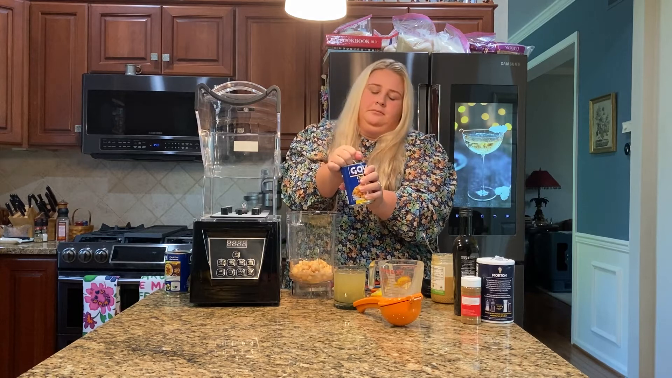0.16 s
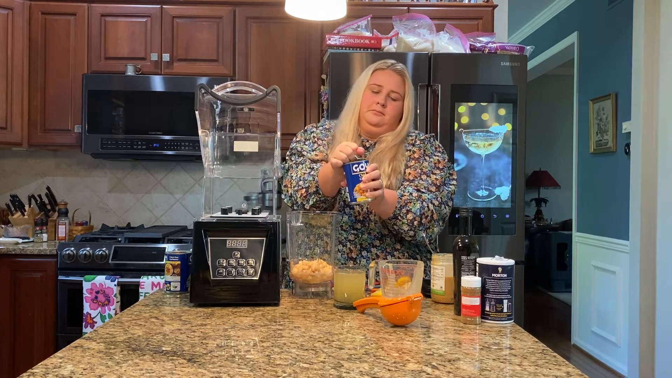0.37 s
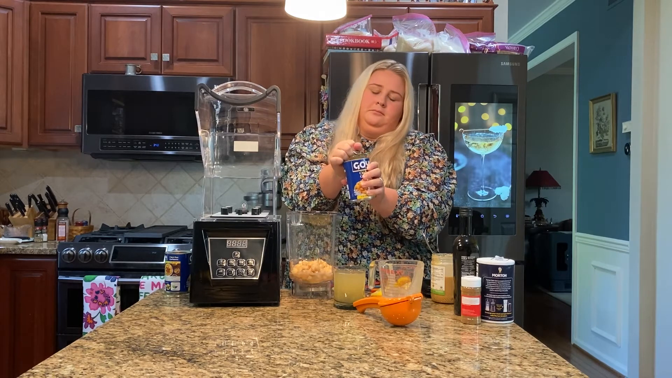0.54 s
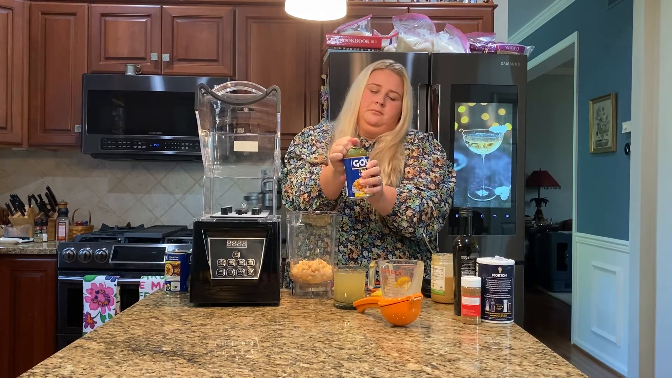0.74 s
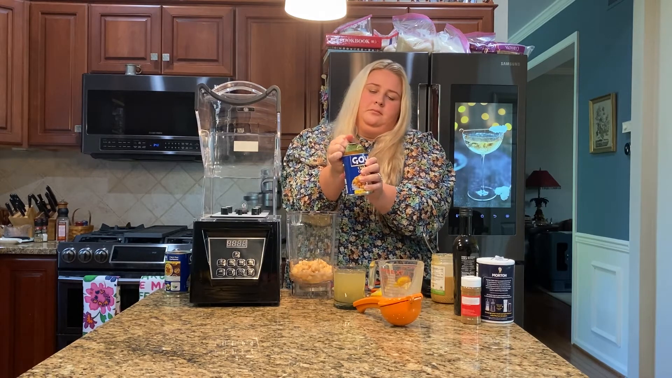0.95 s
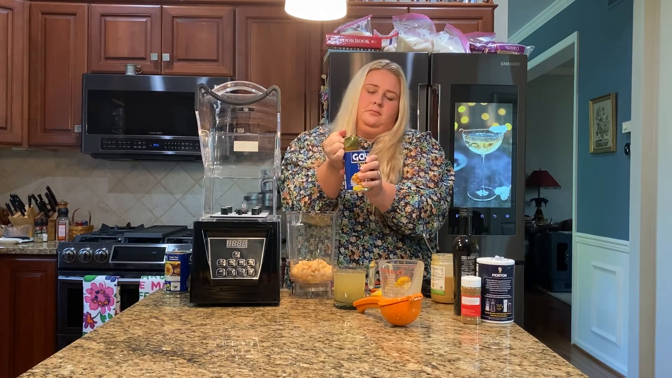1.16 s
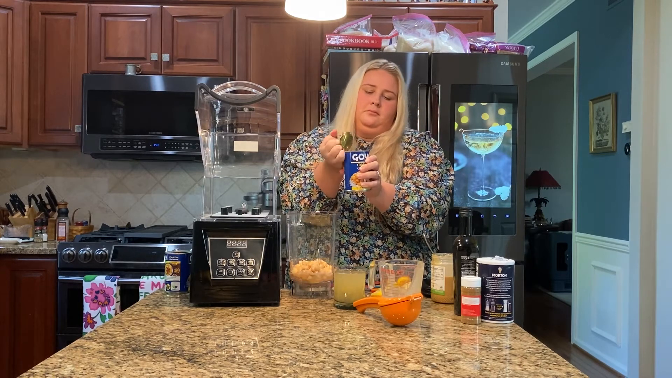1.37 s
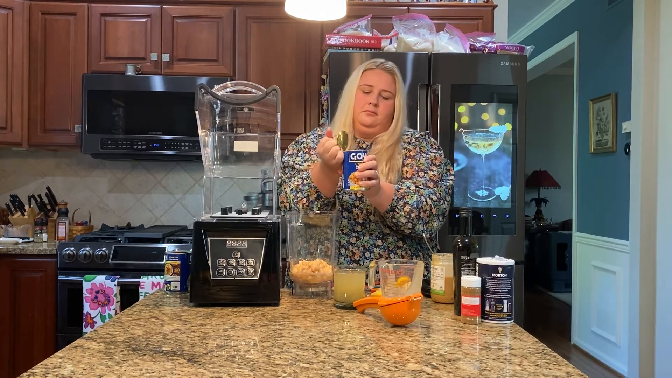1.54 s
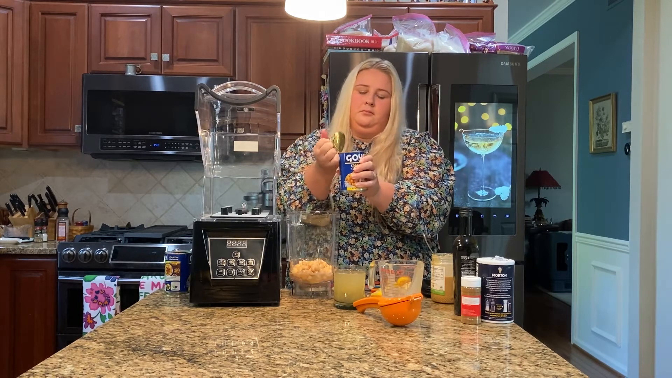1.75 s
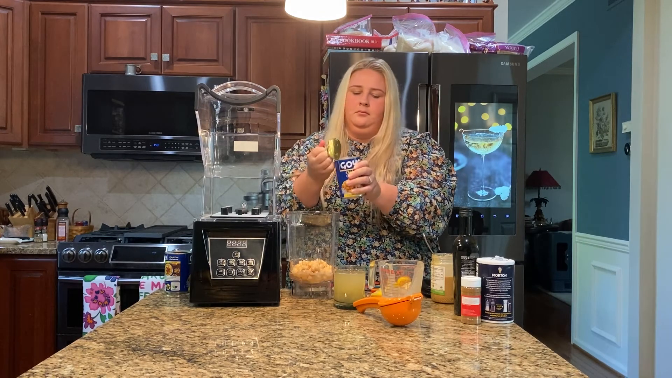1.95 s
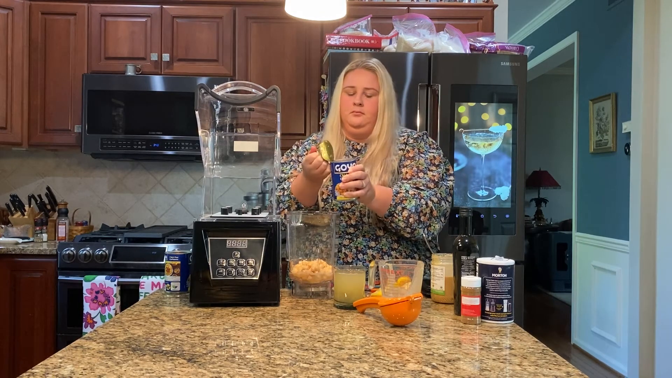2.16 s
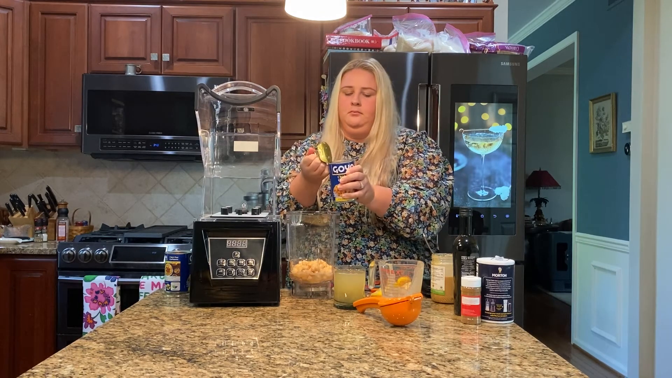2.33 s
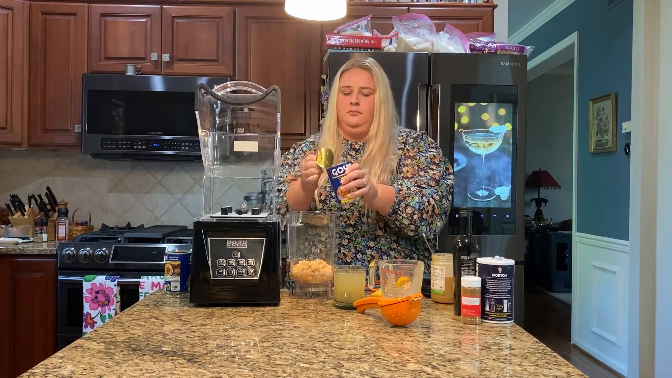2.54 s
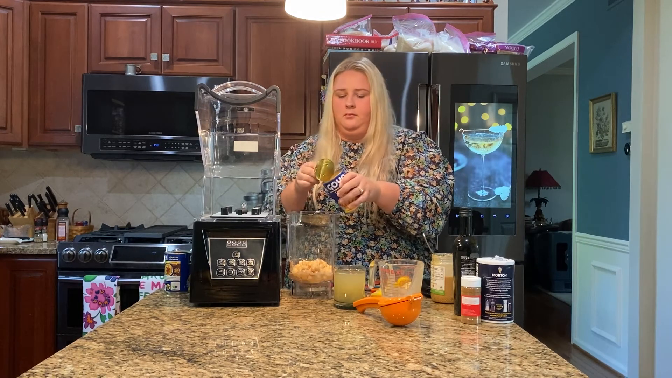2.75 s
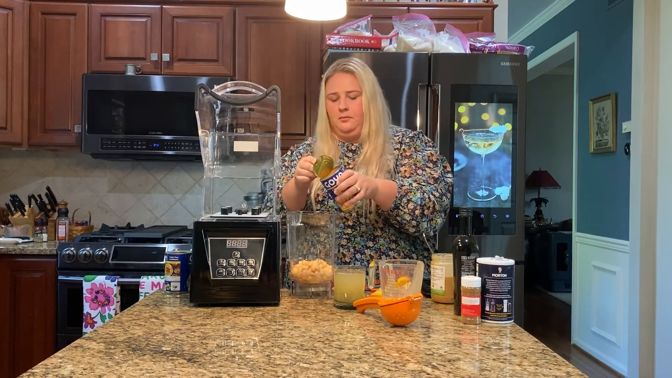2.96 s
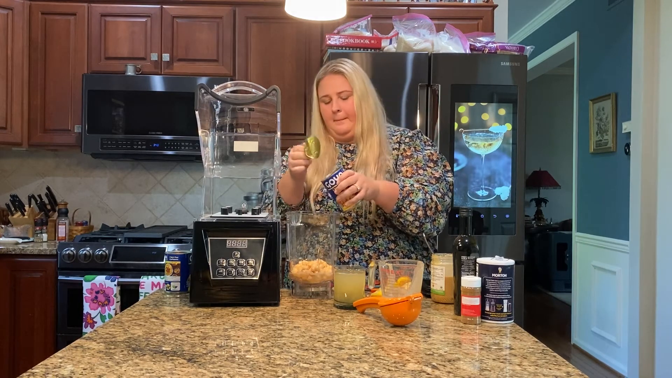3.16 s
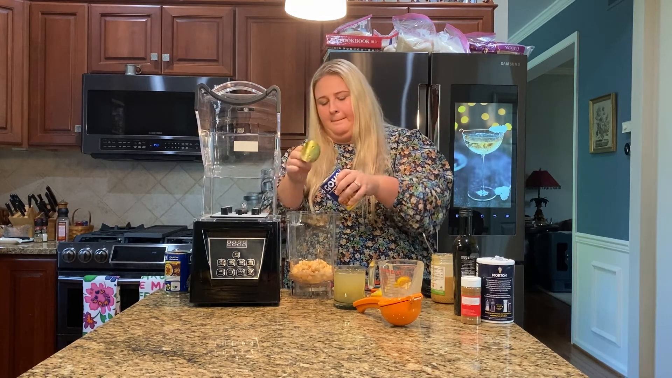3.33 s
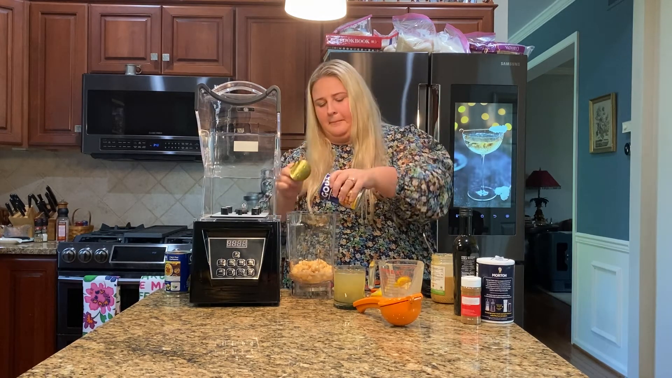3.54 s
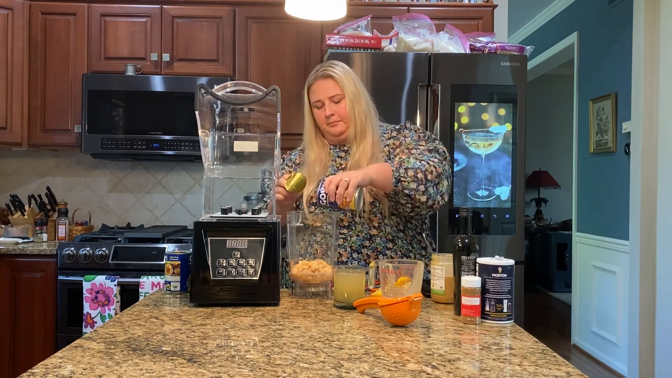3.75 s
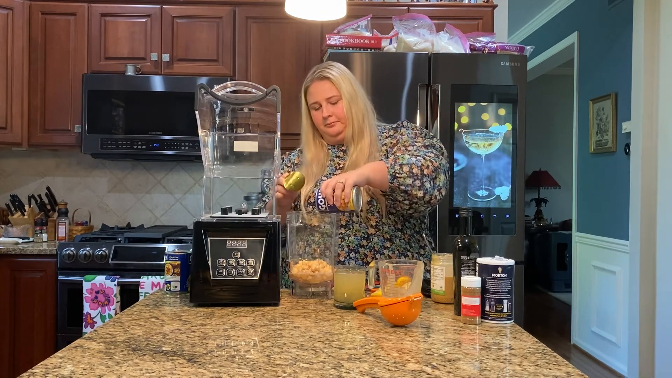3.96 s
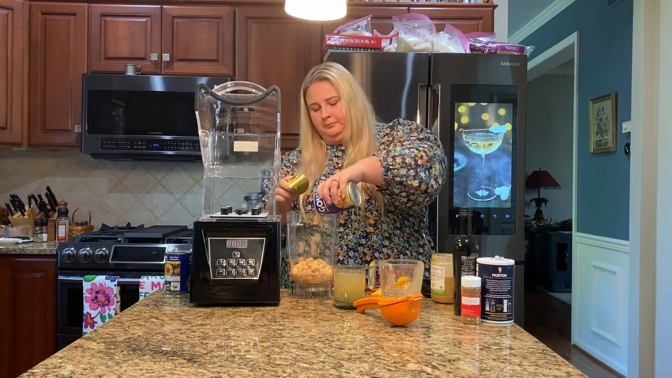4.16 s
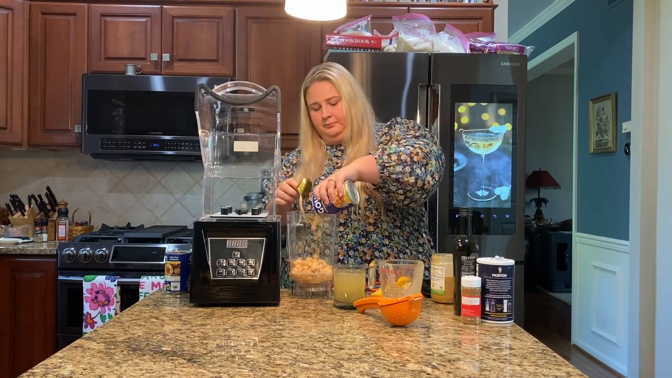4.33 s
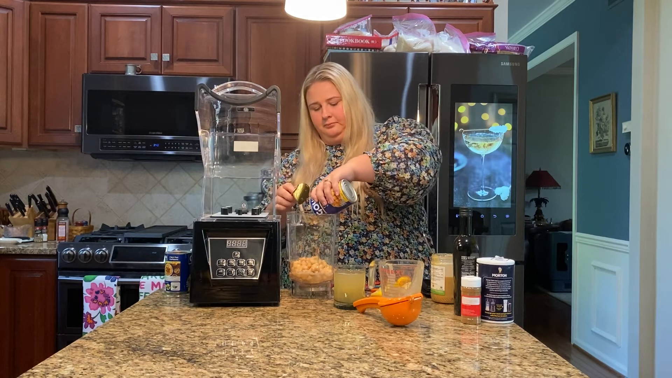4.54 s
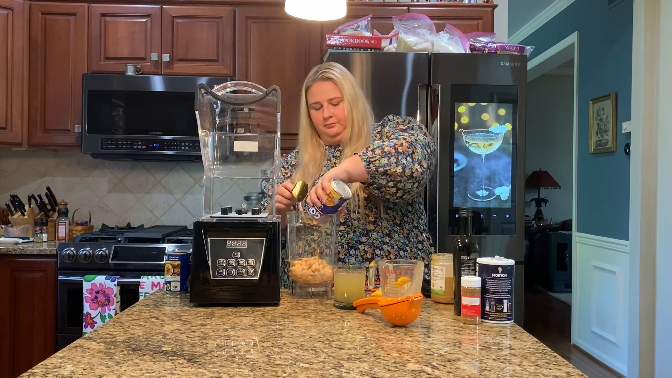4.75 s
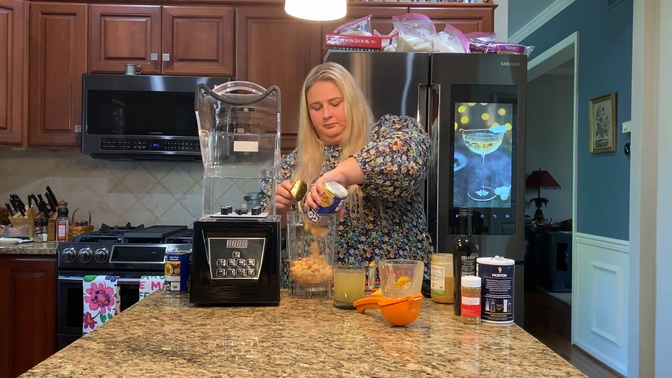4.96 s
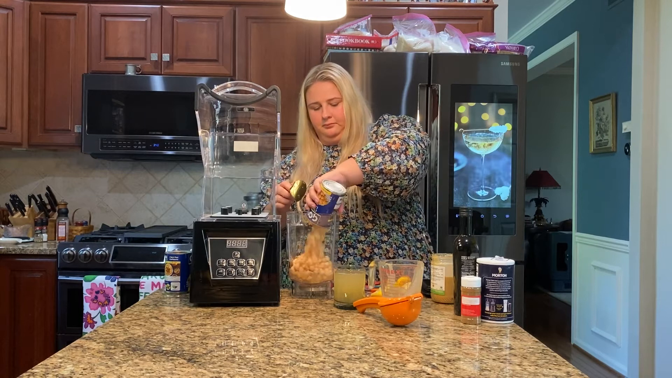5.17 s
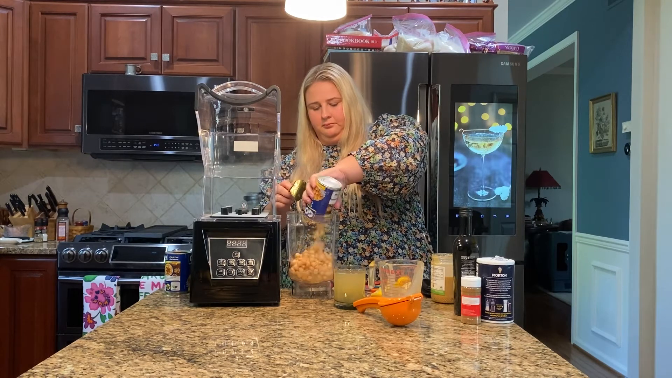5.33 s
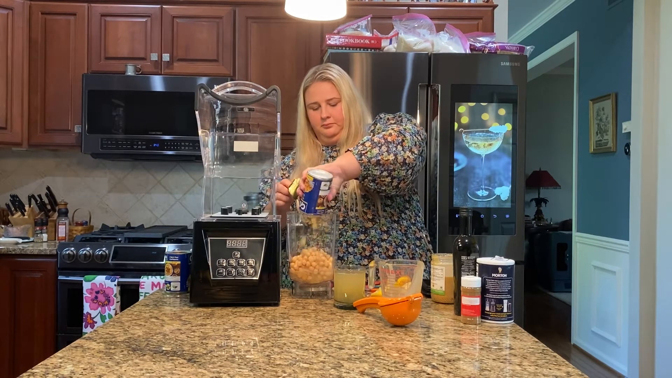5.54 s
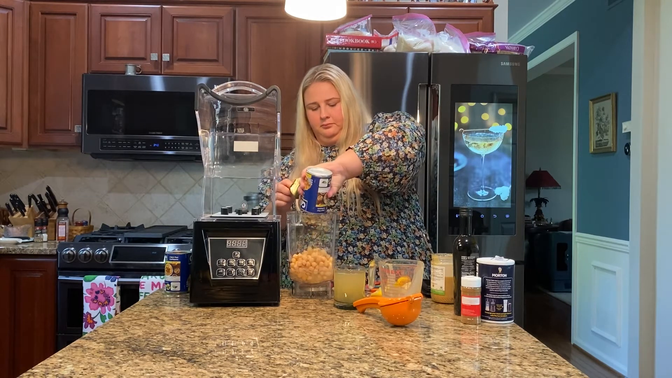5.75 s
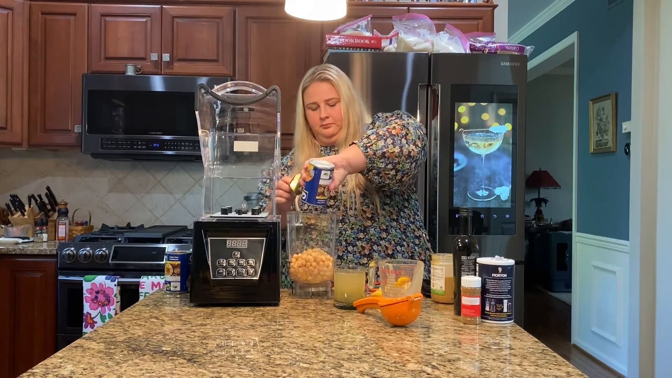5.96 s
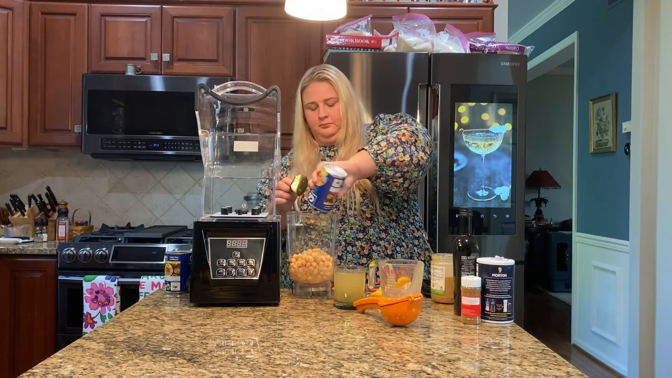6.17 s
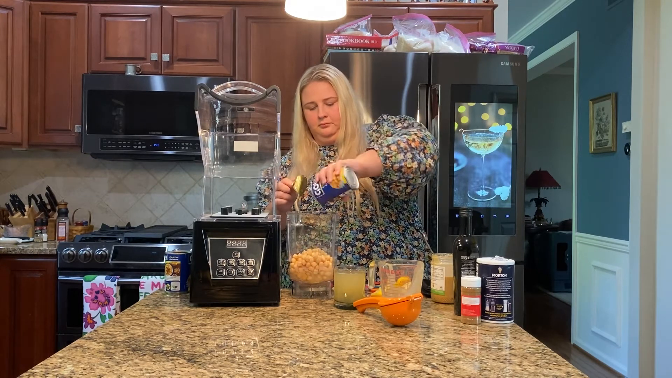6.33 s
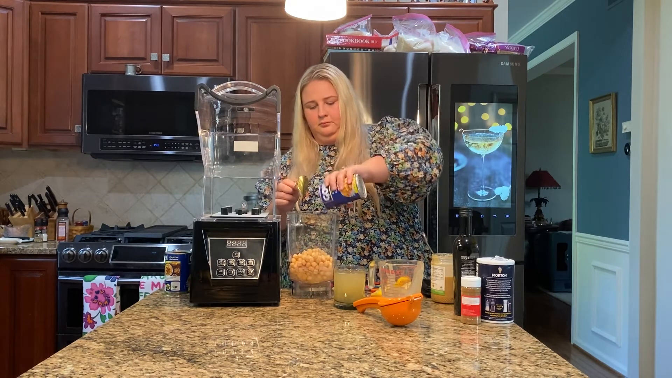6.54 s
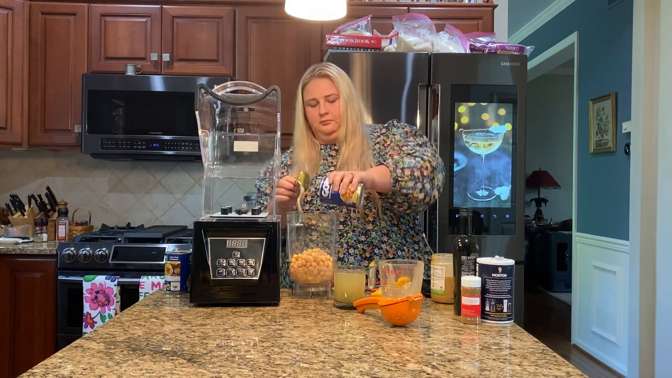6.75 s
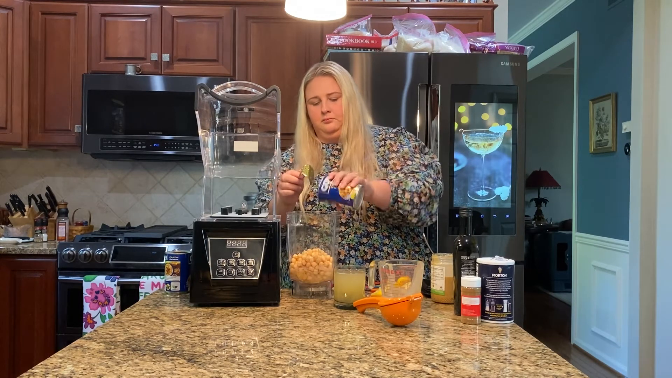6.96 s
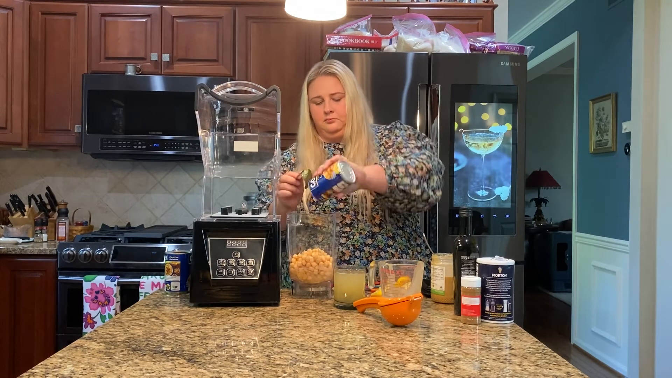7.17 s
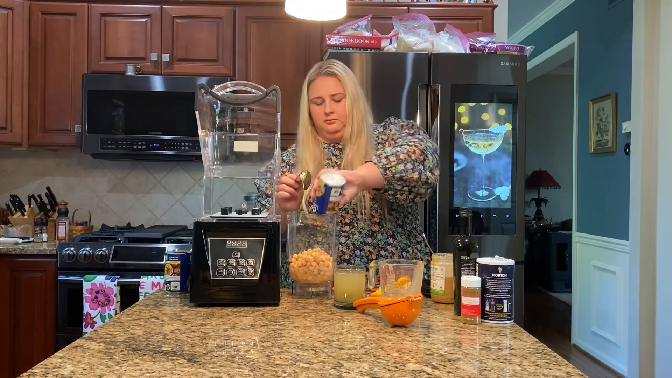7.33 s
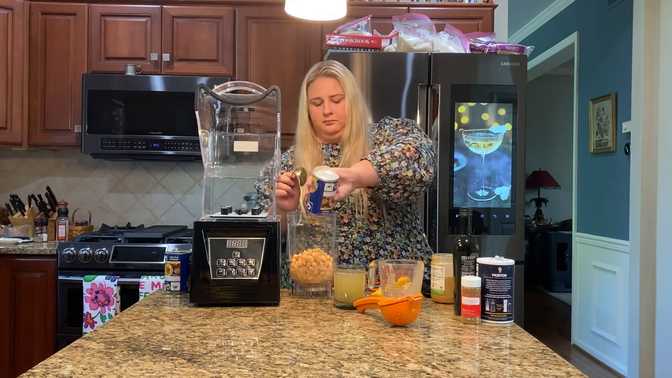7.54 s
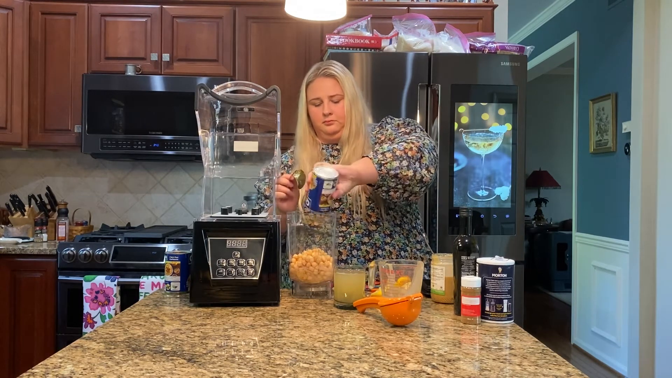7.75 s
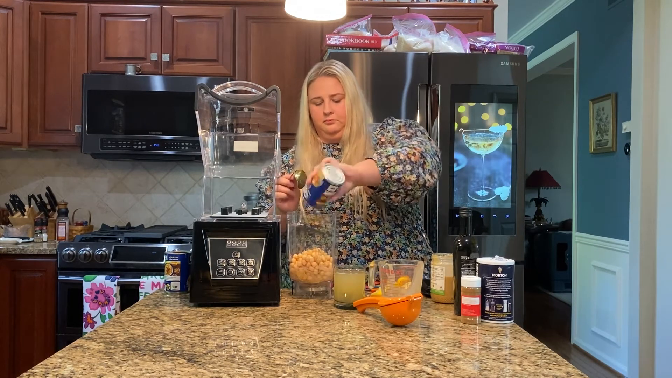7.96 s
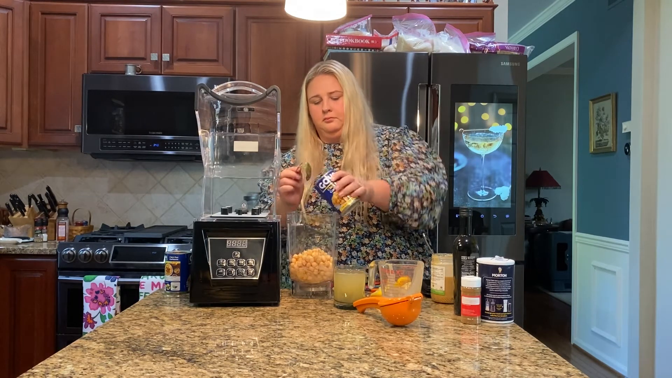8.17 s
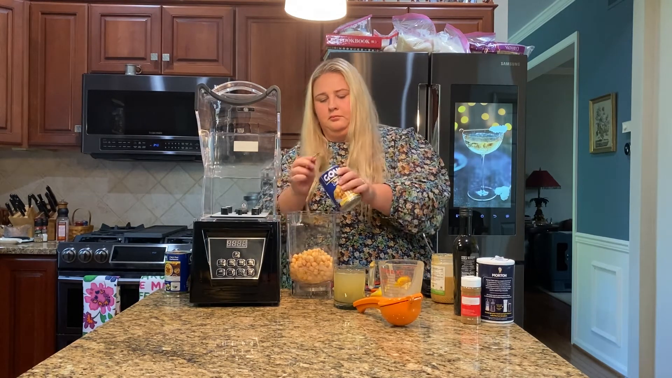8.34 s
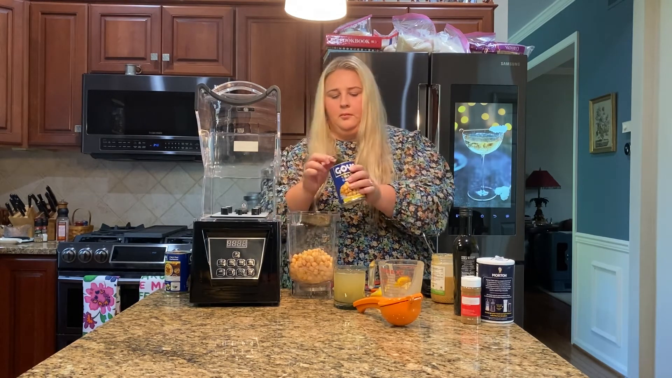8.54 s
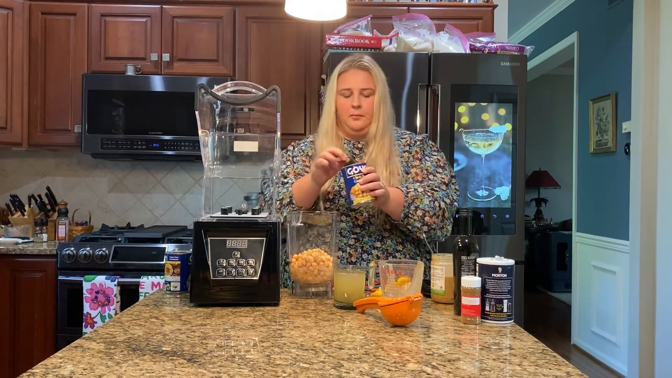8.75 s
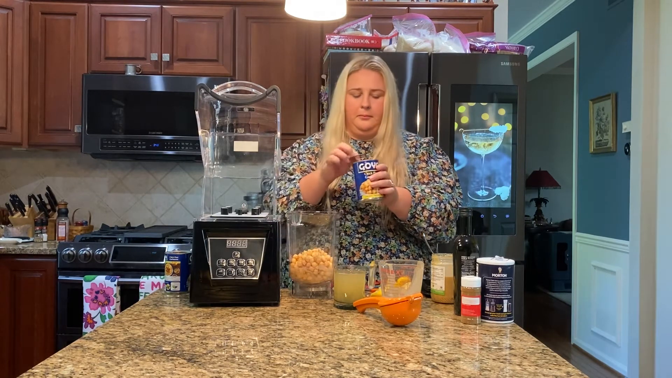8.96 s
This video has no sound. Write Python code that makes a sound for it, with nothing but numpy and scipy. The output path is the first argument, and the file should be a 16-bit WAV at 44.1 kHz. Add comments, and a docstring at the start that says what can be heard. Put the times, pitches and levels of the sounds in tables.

```python
"""A pull tab cracks a can of chickpeas and the lid peels off in snaps, rasps and squeals. Wet clumps
slide out and plop into a blender jar, the can knocks three times on the jar's rim, then the loose lid
ticks and scrapes on the empty, ringing can. A stereo microphone faces the kitchen counter, with the
work slightly to its right; hard walls answer everything over a low appliance rumble."""
import sys
import numpy as np
from scipy import signal
from scipy.fft import rfft, irfft, next_fast_len
from scipy.io import wavfile
from scipy.ndimage import map_coordinates

SR = 44100
rng = np.random.default_rng(int(sys.argv[2]) if len(sys.argv) > 2 else 0)


def wav_record(signal):
    """Record a signal, one row per channel, as 16-bit PCM in the file named by sys.argv[1]."""
    frames = np.transpose(np.atleast_2d(signal))
    bounded = np.clip(frames, -1, 1)
    # unit amplitude maps onto the largest positive 16-bit level
    quanta = np.round(bounded * 32767).astype(np.int16)
    wavfile.write(sys.argv[1], SR, quanta)


N = 396900
SIZE = 16384  # samples in one short sound
HZ = np.fft.rfftfreq(SIZE, 1 / SR)
T = np.arange(SIZE) / SR
TOP_HZ = 15800
OVERTONE_ABOVE_HZ = 3280  # from the lid's main mode to its upper one

# clumps landing in the jar: start_s, level_db, low_db, slap_db
PLOPS = [(3.835, -42.5, -9.5, -14.5), (4.029, -45, -2.5, -7), (4.068, -37, -17, -36.5),
         (4.189, -16, -19, -15), (4.291, -24.5, -28.5, -18), (4.335, -27.5, -22, -8.5),
         (4.374, -18, -20.5, -9.5), (4.42, -34, -12, -27), (4.491, -36, -4, -33), (4.966, -41.5, 12, -56),
         (5.062, -20.5, -16.5, -16.5), (5.096, -33.5, -22.5, -34), (5.114, -30, -3, -36),
         (5.156, -32, 2, -30), (5.182, -24, -5, -10.5), (5.191, -26, 7.5, -16),
         (5.256, -22.5, -12.5, -16.5), (5.281, -35, -12.5, -30), (5.302, -35.5, -23, -33),
         (5.32, -34.5, 12, -16), (5.356, -31.5, 6, -0.5), (5.436, -27, -15, -12), (5.489, -43, -18, -27),
         (5.53, -40, 5, -27), (5.597, -31, -8.5, -40), (5.786, -45, 1, -22.5), (5.812, -34.5, -7.5, -23),
         (6.157, -58, 2, -24)]
# can on the jar's rim, a faint touch and three knocks: start_s, level_db, thump_db, depth_db,
# crack_db, crack_low_db, crack_middle_db, crack_top_db, can_ring_db
KNOCKS = [(7.052, -55, -72, -4, -53.5, -7, -13, -20, -12),
          (7.309, -17, -40, -6, -24.5, -11.5, -9.5, -22, -16), (7.8, -21.5, -29, 0, -31, 3.5, -3.5, -18, 5),
          (8.144, -18, -21.5, 2, -29.5, 0.5, -13, -22, -17)]


def amp(db):
    """Decibels to gain."""
    return 10 ** (np.asarray(db) / 20)


def unit(x):
    """x at rms 1."""
    return x / np.sqrt(np.mean(x ** 2) + 1e-30)


def along(points, hz=HZ):
    """(Hz, value) points joined on a log axis."""
    f, v = np.transpose(points)
    return np.interp(np.log(hz + 1), np.log(f + 1), v)


def peaks(modes):
    """Gain over frequency of resonances given as (pitch_hz, width_hz, level_db)."""
    return sum(amp(db) / (1 + (2 * (HZ - hz) / width) ** 2) for hz, width, db in modes)


def ring(gain):
    """The causal impulse response with this gain, at energy 1."""
    cepstrum = irfft(np.log(np.maximum(gain / gain.max(), 1e-5)))
    cepstrum[1:SIZE // 2] *= 2
    cepstrum[SIZE // 2 + 1:] = 0
    response = irfft(np.exp(rfft(cepstrum)))
    return response / np.linalg.norm(response)


def filtered(x, response):
    """x through a response given as a function of frequency."""
    n = x.shape[-1]
    padded = next_fast_len(n + SIZE)
    return irfft(rfft(x, padded) * response(np.fft.rfftfreq(padded, 1 / SR)), padded)[..., :n]


def wobble(rate):
    """A smooth random curve, rate knots a second."""
    return map_coordinates(rng.standard_normal(int(N * rate / SR) + 4), [np.arange(N) * rate / SR])


def swell(s, rise, fall):
    """A gain of 1 at time s, 20 dB lower rise seconds before and fall seconds after."""
    t = np.arange(N) / SR - s
    return amp(-20 * np.minimum(np.maximum(-t / rise, t / fall), 10))


def add(track, s, sound):
    """Mix a short stereo sound into the track at time s."""
    part = track[:, max(round(s * SR), 0):][:, :SIZE]
    part += sound[:, :part.shape[1]]


def contact(gain, length, evenness=0.38):
    """A rough contact that swells and dies in length seconds, through a body; energy 1."""
    age = T / max(length, 1e-3)
    spectrum = rfft(rng.standard_normal(SIZE) * np.sqrt(T) * amp(-55 * age))
    # a crack drives all pitches about equally
    force = irfft(spectrum / (np.abs(spectrum) + 1e-12) ** evenness) * amp(-10 * age)
    sound = signal.fftconvolve(force, ring(gain))[:SIZE]
    return sound / np.linalg.norm(sound)


def grains(gain, rate, spread_db):
    """Tiny random impacts of uneven size, rate a second, through a body; rms 1."""
    chance, size = rng.random(N), rng.standard_normal(N)
    kicks = (chance < rate / SR) * amp(spread_db * np.clip(size, -2, 2)) * rng.choice([-1, 1], N)
    return unit(signal.fftconvolve(kicks, ring(gain))[:N])


def tin(low_db, middle_db, top_db):
    """Broad colour of thin sheet metal, set by where and how hard it is touched."""
    return amp(along([(100, low_db - 9.5), (450, low_db + 6), (1100, low_db + 1.5),
                      (1700, middle_db - 5), (2500, middle_db - 6.5), (3800, -20), (7500, -15.5),
                      (10000, top_db - 3), (12400, top_db), (14200, top_db - 7), (16000, top_db - 36)]))


def diffuse(n):
    """Noise reaching the microphone from all sides: alike in the bass, less so above."""
    # likeness of left and right: frequency_hz, correlation
    alike = [(60, 0.94), (150, 0.82), (400, 0.59), (1200, 0.13), (3000, 0.71), (7000, 0.051), (12500, 0.25)]

    def mid_and_side(hz):
        angle = np.arccos(along(alike, hz)) / 2
        return np.array([np.cos(angle), np.sin(angle)])

    mid, side = filtered(rng.standard_normal((2, n)), mid_and_side)
    return np.array([mid + side, mid - side])


def room(x, wet_db, right_db, gap_s=0.0027):
    """Panned direct sound, and the kitchen's answer after a short gap."""
    # decay of the kitchen: frequency_hz, t60_s
    decay = [(150, 0.72), (450, 0.31), (1000, 0.39), (2800, 0.4), (7000, 0.37), (14000, 0.25)]
    hz, t, spectra = signal.stft(diffuse(SIZE), SR, nperseg=256)
    tail = signal.istft(spectra * amp(-60 * t / along(decay, hz)[:, None]), SR, nperseg=256)[1]
    tail = tail[:, :SIZE] * (1 - np.exp(-(T / gap_s) ** 2))
    wet = signal.fftconvolve(x[None], tail, axes=1)[:, :len(x)]
    direct = x * amp([[-right_db / 2], [right_db / 2]])
    # the walls soak up some treble
    soak = lambda hz: amp(along([(3000, 1.5), (7000, -4), (12500, -2.5)], hz))
    return direct + filtered(amp(wet_db) * np.std(x) * unit(wet), soak)


def appliances(hiss_db=-66, mains_hz=60, hum_db=-72, shake_db=-42):
    """Room tone: steady hiss, faint mains hum and a shifting rumble that grows as the counter shakes."""
    # steady background hiss, with a thin high sheen: frequency_hz, density_db
    hiss_colour = [(20, -25.5), (60, -1), (130, -12), (250, -8.5), (450, -20.5), (920, -29.5),
                   (1800, -36.5), (3100, -43), (8000, -42.5), (10000, -48.5), (12400, -42.5),
                   (14000, -57.5), (16000, -72.5)]
    # slow drift of the rumble: time_s, level_db
    rumble_levels = [(0, -68), (1.85, -70), (2.2, -64.5), (3.4, -69.5), (3.92, -58.5), (4.7, -63.5),
                     (5.6, -61.5), (6.6, -75.5), (7.35, -64), (8.4, -66)]
    rumble_colour = [(25, -28.5), (58, 5), (90, 0.5), (200, -7), (400, -28), (1000, -49.5)]
    t = np.arange(N) / SR
    hiss = amp(hiss_db) * unit(filtered(diffuse(N), lambda hz: amp(along(hiss_colour, hz))))
    low = unit(filtered(diffuse(N), lambda hz: amp(along(rumble_colour, hz))))
    shake_power = sum((amp(db + shake_db) * swell(s, 0.022, 0.28)) ** 2 for s, db, *_ in PLOPS + KNOCKS)
    drift = amp(np.interp(t, *np.transpose(rumble_levels)))
    rumble = np.sqrt(drift ** 2 + shake_power) * low
    return hiss + rumble + amp(hum_db) * np.sin(2 * np.pi * mains_hz * t)


def empty_can(spot_db=8.5, spot_octaves=0.054, vary_db=2, attack_s=0.00046):
    """The lid ticks and scrapes on the empty can, whose wall rings differently at each spot touched."""
    # modes of the can's wall: pitch_hz, level_db, t60_s
    wall_modes = [(627.7, -1, 0.16), (682, -9, 0.091), (1366, -2, 0.33), (2010, -3.5, 0.14),
                  (2260, -3, 0.23), (2690, -5.5, .23), (2890, -2, 0.27), (3080, -5, 0.19), (3176, 1, 0.18),
                  (3940, -11, .22), (4284, -8, 0.22), (4660, -6, .25), (5490, -2.5, .28), (6170, -9, .22),
                  (6330, -3, .2), (7080, -3, .18), (7900, -6, .22)]
    # touches of the lid: start_s, tick_db, body_db, top_db, length_s, ring_db,
    # brightness_db_per_octave, scrape_db, first_favoured_hz, second_favoured_hz
    touches = [(8.459, -40.5, -6.5, -22, 0.0033, -32.5, -5.5, -73, 1362, 2260),
               (8.534, -41, -13, -14.5, 0.087, -47, 0.5, -79, 1362, 6350),
               (8.603, -30, -10, -20, 0.011, -34.5, -2.5, -72, 630, 4730),
               (8.742, -35, -16, -10, 0.1, -41, 3.5, -54, 3200, 5490),
               (8.841, -34, -19.5, -9.5, 0.049, -40, 7, -61.5, 2700, 4330),
               (8.94, -40.5, -18, -9, 0.087, -43, 0.5, -61.5, 630, 2020)]
    hz, mode_db, t60 = np.transpose(wall_modes)
    partials = np.sin(2 * np.pi * hz[:, None] * T) * amp(-60 * T / t60[:, None])
    # the small can radiates little bass
    radiation = amp(along([(250, -11.5), (600, 0.5), (1000, -0.5), (1800, 1.5), (3000, 4.5), (7000, -2)]))
    # the lid slides on after each touch
    sliding = sum(amp(db) * swell(s + 0.012, 0.095, 0.075) for s, *_, db, _, _ in touches)
    wall = amp(-21) + peaks([(f, 35, db) for f, db, _ in wall_modes])
    scrape = sliding * amp(3.8 * wobble(30)) * grains(wall, rate=460, spread_db=4.5)
    out = room(scrape, wet_db=3, right_db=0)
    for s, tick_db, body_db, top_db, length, ring_db, bright_db, _, *spots in touches:
        tick = amp(tick_db + 15) * contact(tin(body_db - 3, body_db - 3.5, top_db - 5) * radiation, length)
        favour = sum(np.exp(-(np.log2(hz / spot) / spot_octaves) ** 2) for spot in spots)
        levels = mode_db + spot_db * favour + bright_db * np.log2(hz)
        levels += vary_db * rng.standard_normal(len(hz))
        clink = amp(levels) @ partials * (1 - np.exp(-T / attack_s))
        clink *= amp(ring_db + 17.5) / np.linalg.norm(clink)
        add(out, s, room(tick, wet_db=3.5, right_db=1) + room(clink, wet_db=-2, right_db=-0.5))
    return out


def knocks():
    """The can hits the rim: a tinny crack, the jar's hollow note and a short thump into the counter."""
    # the jar struck at its rim: pitch_hz, width_hz, level_db
    rim_modes = [(396, 110, 1), (486, 63, 3), (547, 62, 0.5), (640, 99, -17), (725, 82, -15),
                 (797, 42, -9.5), (1090, 60, -31), (1440, 69, -25), (1665, 110, -25)]
    # the counter under the jar: pitch_hz, width_hz, level_db
    counter_modes = [(191.4, 18, -4), (288, 110, -2)]
    out = np.zeros((2, N))
    for s, db, thump_db, depth_db, crack_db, low_db, middle_db, top_db, can_db in KNOCKS:
        depth = amp(along([(200, 2), (300, -3.5), (390, depth_db), (490, 0)]))
        hollow = amp(db + 13.5) * ring(peaks(rim_modes) * depth)
        thump = amp(thump_db + 10.5) * ring(peaks(counter_modes))
        sheet = tin(low_db - 3, middle_db + 3.5, top_db + 0.5) + peaks([(2200, 70, can_db)])
        crack = amp(crack_db + 13) * contact(sheet, length=0.017)
        body = room(hollow, wet_db=3, right_db=-0.5) + room(thump, wet_db=0.5, right_db=-1)
        add(out, s + 0.0032, body)
        add(out, s, room(crack, wet_db=2, right_db=-1))
    return out


def bubbles(centre_hz, octaves, cycles, spread_db, count):
    """Tiny wet pops, each with its own pitch and size; rms 1."""
    when, pitch, size = rng.random((count, 3)).T
    hz = np.minimum(centre_hz * 2 ** (octaves * (pitch - 0.5)), TOP_HZ)
    turns = hz[:, None] * T[:256]
    # small, high pops are briefer but sharper
    strength = amp(spread_db * size ** 2) * np.sqrt(hz)
    pops = strength[:, None] * np.sin(2 * np.pi * turns) * np.exp(-turns / cycles)
    where = (when * N).astype(int)[:, None] + np.arange(256)
    return unit(np.bincount(where.ravel(), pops.ravel())[:N])


def plop(jar_modes, db, low_db, slap_db, detune=0.029, squash_s=0.003, settle_s=0.019, lag_s=0.00913):
    """A soft clump drums on the jar: the note swells as it squashes and is damped as it settles."""
    softness = amp(along([(200, low_db + 11), (390, low_db + 15.5), (540, 0),
                          (800, slap_db + 20.5), (1100, slap_db + 15), (2200, slap_db + 11.5)]))
    shift = 1 + detune * rng.uniform(-1, 1)  # each clump loads the jar differently
    jar = peaks([(hz * shift, width, level) for hz, width, level in jar_modes])
    front = ring(jar * softness) * (1 - np.exp(-(T / squash_s) ** 2)) / (1 + (T / settle_s) ** 4)
    front *= amp(db + 20) / np.linalg.norm(front)
    # the rest of the clump lands a moment after its front
    rest = amp(-6) * np.interp(T - lag_s * rng.uniform(0.726, 1.301), T, front, 0)
    return front + rest


def chickpeas():
    """Peas slide from the can into the jar, squelching, while the brine sloshes and crackles."""
    # the part-filled jar: pitch_hz, width_hz, level_db
    jar_modes = [(385.8, 36, -2), (444, 74, -7), (526.8, 64.5, 4.5), (658.5, 180, -12), (773, 21, -19),
                 (904, 11, -24), (1060, 37, -28), (1254, 70, -36), (1527, 170, -35.5), (2003, 220, -36)]
    # surges of peas leaving the can: peak_s, rise_s, fall_s, slosh_db, crackle_db
    surges = [(3.919, 0.1, 0.37, -59.5, -83), (4.37, .25, 0.2, -46, -69.5),
              (5.05, 0.11, 0.45, -56.5, -58.5), (5.18, 0.29, 0.13, -49.5, -56.5),
              (5.38, 0.44, .3, -56.5, -65)]
    # wet peas sliding on tin: frequency_hz, density_db
    brine_colour = [(400, -8.5), (1300, 1.5), (3000, -2.5), (7000, -1.5), (12300, -4), (14000, -6.5),
                    (16000, -25)]
    # peas sucking loose from the can and each other: start_s, level_db, pitch_hz, length_s
    squelches = [(2.294, -55.5, 1640, 0.056), (3.294, -53.5, 1810, .06), (3.922, -59, 2260, 0.083),
                 (4.015, -55, 1950, .06), (4.191, -51, 6570, .008), (4.371, -53, 2895, 0.018),
                 (4.429, -54, 6720, 0.028), (4.822, -59.5, 2840, 0.0074), (4.913, -48, 3490, 0.012),
                 (5.016, -42, 4040, 0.024), (5.152, -41, 6650, 0.0073), (5.218, -42, 6570, .012),
                 (5.288, -41.5, 6620, .012), (5.354, -45.5, 4840, .04), (5.384, -45.5, 7070, 0.013),
                 (5.414, -50, 6520, 0.0066), (5.483, -45.5, 7450, 0.0076), (5.527, -45, 5050, 0.031),
                 (5.613, -43.5, 7540, 0.014), (5.825, -68, 3190, 0.0073), (6.298, -59.5, 1700, .04),
                 (6.62, -61, 4260, 0.05)]
    sloshing = sum(amp(db) * swell(s, rise, fall) for s, rise, fall, db, _ in surges)
    crackling = sum(amp(db) * swell(s, rise, fall) for s, rise, fall, _, db in surges)
    jar = peaks(jar_modes) * amp(along([(350, 3.5), (550, -10), (1000, -3)]))
    slosh = amp(-3) * sloshing * grains(jar, rate=170, spread_db=2)
    pops = amp(-11.5) * bubbles(centre_hz=3904, octaves=3, cycles=3.9, spread_db=8.5, count=14000)
    smear = amp(-12.5) * grains(amp(along(brine_colour)), rate=3000, spread_db=6.5)
    lumps = amp(2.4 * wobble(22) - 5)  # peas sliding past each other
    out = room(slosh + crackling * lumps * (pops + smear), wet_db=1, right_db=4)
    for s, db, low_db, slap_db in PLOPS:
        add(out, s, room(plop(jar_modes, db, low_db, slap_db), wet_db=-5.5, right_db=-0.5))
    for s, db, hz, length in squelches:
        colour = peaks([(hz, 0.41 * hz, 0), (2.8 * hz, 0.58 * hz, -16)])
        add(out, s, room(amp(db + 4.5) * contact(colour, length), wet_db=5, right_db=1.5))
    return out


def squeals(jitter=0.055, rough_db=5):
    """Even stick-slip at the seam: a rough, wavering squeal that glides as the lid bends."""
    # squeals of the lid: start_s, length_s, level_db, start_hz, end_hz
    glides = [(0.38, 0.036, -46.5, 1456, 1210), (0.423, .075, -54.5, 1284, 1389),
              (0.961, 0.047, -45, 1988, 2226), (1.02, 0.067, -53, 2150, 2000),
              (2.92, 0.03, -51, 2473, 2363), (2.936, .03, -56.5, 1880, 2017)]
    # partials of a squeal: pitch_ratio, level_db
    partials = [(0.5, -10.5), (1, 0), (1.5, -10), (2, -17)]
    t, out = np.arange(N) / SR, np.zeros(N)
    waver = 1 + jitter * wobble(420)
    for s, length, db, start_hz, end_hz in glides:
        age = (t - s) / length
        on = (age > 0) & (age < 1)
        hz = (start_hz + (end_hz - start_hz) * age[on]) * waver[on]
        phase = 2 * np.pi * np.cumsum(hz) / SR
        tone = sum(amp(level) * np.sin(ratio * phase) for ratio, level in partials)
        out[on] += amp(db) * np.sqrt(np.sin(np.pi * age[on])) * tone
    return room(out * amp(rough_db * (wobble(170) - 1)), wet_db=1, right_db=2)


def lid_hz(s):
    """The lid's main resonance at time s, rising as its attached part shrinks."""
    # course of the resonance: time_s, pitch_hz
    lid_pitch = [(.16, 1120), (.41, 1270), (.67, 1810), (.97, 2030), (1.1, 2080), (1.35, 2440),
                 (2.95, 2310), (2.98, 2740)]
    return np.interp(s, *np.transpose(lid_pitch))


def catches(t, per_second=26, scatter=0.16):
    """The lid's pitch holds while the seam is caught and jumps as it slips on."""
    count = int(N / SR * per_second) + 2
    gap, jump = rng.uniform(0, 1, count), rng.uniform(-1, 1, count)
    slip_s = (np.arange(count) + gap) / per_second
    held_hz = lid_hz(slip_s) * (1 + scatter * jump)
    return held_hz[np.minimum(np.searchsorted(slip_s, t), count - 1)]


def lid_rasp(width_hz=340):
    """Tiny slips ring the bending lid's main mode and a weaker one below and above; rms 1."""
    hz, t, spectra = signal.stft(grains(np.ones(len(HZ)), rate=1200, spread_db=6.5), SR, nperseg=256)
    main_hz = catches(t)
    mode = lambda centre, width: 1 / (1 + (2 * (hz[:, None] - centre) / width) ** 2)
    outer = mode(main_hz / 2, width_hz / 2) + mode(main_hz + OVERTONE_ABOVE_HZ, width_hz)
    modes = mode(main_hz, width_hz) + amp(-10) * outer
    return unit(signal.istft(spectra * modes, SR, nperseg=256)[1][:N])


def snap(db, hz, ring_db, top_db, length, low_db):
    """One crack of the tin: the lid rings at hz and its overtone, with a glassy sizzle near 12.4 kHz."""
    modes = [(hz, 0.36 * hz, ring_db - 6), (hz + OVERTONE_ABOVE_HZ, 170, ring_db - 16),
             (12470, 420, top_db - 8.5)]
    sheet = tin(low_db, -16, top_db - 0.5) + peaks(modes)
    return room(amp(db + 13) * contact(sheet, length), wet_db=2.5, right_db=0)


def lid():
    """The scored seam cracks in snaps and tears in tiny slips between them; a hand rubs the can."""
    # pulls on the tab, building up and giving way: peak_s, length_s, bending_db, tearing_db
    pulls = [(0.184, 0.13, -46, -78), (0.379, 0.051, -56, -72.5), (0.52, 0.25, -58.5, -65.5),
             (0.668, 0.25, -57, -69), (0.973, 0.12, -45.5, -51.5), (1.191, 0.16, -59.5, -56.5),
             (1.328, 0.03, -71, -68.5), (1.516, 0.046, -66, -68), (1.995, 0.16, -78, -62),
             (2.376, 0.029, -80, -71), (2.942, 0.027, -44, -50.5)]
    # the hand shifting its grip: peak_s, rise_s, fall_s, level_db
    grips = [(1.8, .15, 0.34, -71.5), (2.45, .15, 0.39, -71), (3.47, .14, 0.23, -69), (3.6, .2, 0.12, -74),
             (7.22, .12, 0.31, -76)]
    # spectrum of the tearing seam: frequency_hz, density_db
    tear_colour = [(300, -15), (600, 8), (1300, -1.5), (2500, 2), (3600, -1.5), (5000, -1.5), (7500, 0.5),
                   (10000, -9), (12300, -4.5), (14000, -7), (16000, -24)]
    # the seam giving way, and clicks of the tin: start_s, level_db, ring_db, top_db, length_s
    snaps = [(0.112, -44, -34, -34, 0.054), (0.152, -26.5, -28, -29, 0.051), (0.158, -29, 12.5, -36, 0.071),
             (0.377, -33.5, 10, -30.5, 0.073), (0.394, -34, 8, -19, 0.022), (0.423, -35.5, 2.5, -19, 0.018),
             (0.535, -50, 1, -33, 0.019), (0.662, -40, 17, -17, 0.07), (0.781, -44, 4, -20, 0.012),
             (0.858, -48.5, -8, -24, 0.0069), (0.962, -35.5, -1, -14.5, 0.13),
             (1.206, -46.5, -12, -38, 0.03), (1.319, -46.5, 3, -25, 0.028), (1.55, -43.5, -17, -13, 0.023),
             (2.011, -43, -15, -13.5, 0.004), (2.565, -40, -26, -18, 0.045),
             (2.58, -33.5, -33, -19.5, 0.023), (2.733, -41, 2, -20.5, 0.022),
             (2.749, -32.5, -6.5, -20.5, 0.023), (2.767, -25.5, -8, -20, 0.018),
             (2.918, -36.5, -13.5, -14.5, 0.17), (2.9854, -21, -13, -8, 0.014),
             (3.423, -50, -24, -7, 0.012), (3.432, -49, -24, -12, 0.0087), (6.968, -51.5, -25, -13, 0.0055),
             (7.018, -50, -13, -12, 0.11), (7.05, -54.5, -9, -15, 0.039), (7.18, -59.5, -27, -8, 0.077),
             (8.055, -51.5, -43, -12, 0.012), (8.079, -49.5, -43, -13, 0.0074)]
    bending = sum(amp(db) * swell(s, 0.72 * length, length) for s, length, db, _ in pulls)
    tearing = sum(amp(db) * swell(s, 0.72 * length, length) for s, length, _, db in pulls)
    rubbing = sum(amp(db) * swell(s, rise, fall) for s, rise, fall, db in grips)
    rasp = amp(-5.5) * bending * lid_rasp()
    jerks = amp(4.5 * wobble(70) - 7.5)
    tear = tearing * grains(amp(along(tear_colour)), rate=650, spread_db=5.5)
    rustle = rubbing * amp(1.5 * wobble(25) - 7) * grains(tin(-23, -15, -14.5), rate=5000, spread_db=3)
    out = room(jerks * (rasp + tear) + rustle, wet_db=6.5, right_db=1)
    # the tab punches through the seam
    add(out, 0.1215, snap(db=-24.5, hz=1835.5, ring_db=-2.5, top_db=-13.5, length=0.09, low_db=-37))
    for s, db, ring_db, top_db, length in snaps:
        low_db = -18.5 + 0.28 * ring_db  # the more the lid rings, the more bass
        add(out, s, snap(db, lid_hz(s), ring_db, top_db, length, low_db))
    return out


def scene():
    """Everything on the counter, over the room tone."""
    return lid() + squeals() + chickpeas() + knocks() + empty_can() + appliances()


def record(dry):
    """The microphone's ports cancel a band near 9 kHz; nothing passes above the band limit."""
    # frequency_hz, gain_db
    ports = [(8000, -0.5), (8600, -12.5), (9150, -29), (9700, -6), (10300, 1.5), (13500, 3), (15500, -7.5)]
    # the counter lies slightly to the right, so that side is louder: frequency_hz, gain_db
    lean = [(60, 0.64), (500, 2), (1000, 1.1), (4000, 1.5), (8000, -0.06)]
    # and a touch earlier: frequency_hz, phase_rad
    lead = [(100, 0.038), (1000, 0.22), (3000, 0.062), (6000, 0.64), (8000, 0.8), (12000, 0.18)]
    side = np.array([[-1], [1]])
    stereo = lambda hz: amp(side * along(lean, hz)) * np.exp(1j * side * along(lead, hz))
    return filtered(dry, lambda hz: amp(along(ports, hz)) * stereo(hz) * (hz < TOP_HZ))


dry = scene()
out = record(dry)
wav_record(out)
```